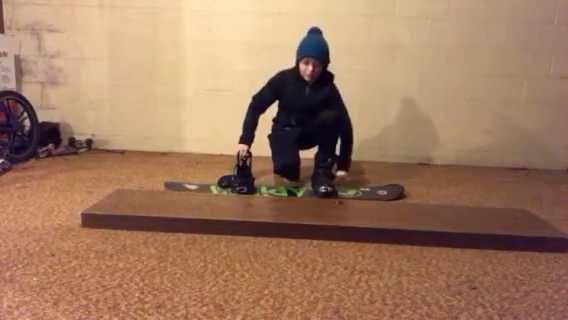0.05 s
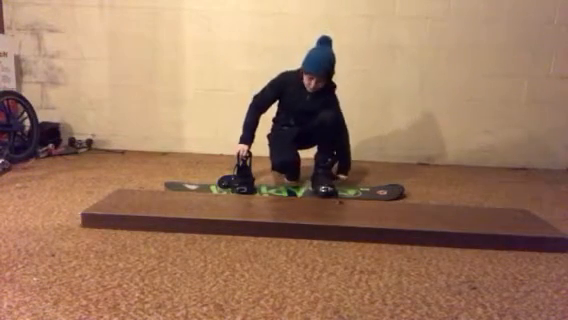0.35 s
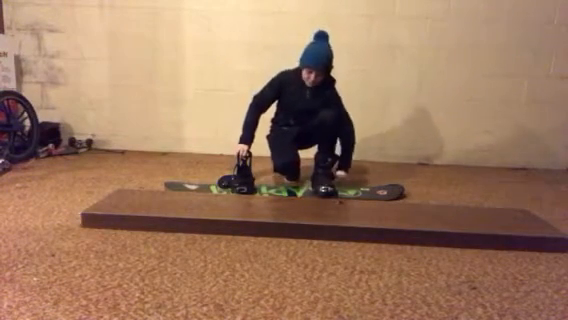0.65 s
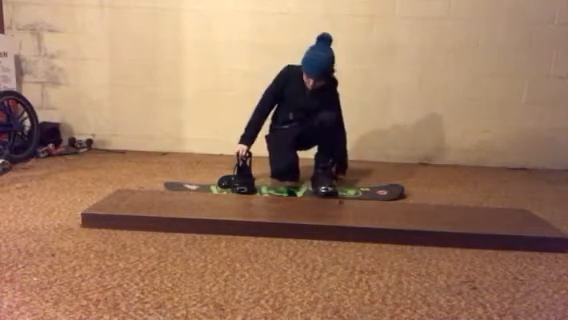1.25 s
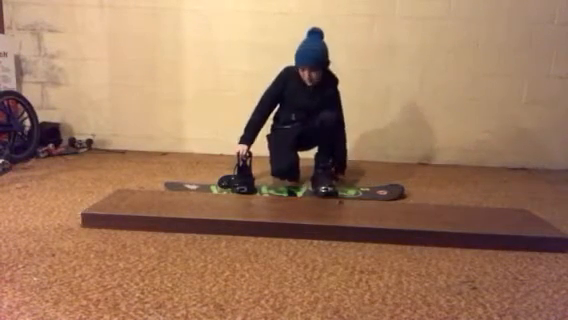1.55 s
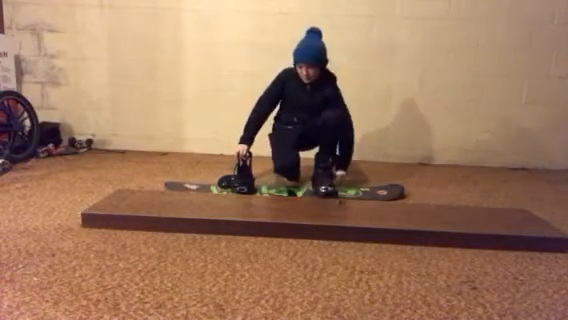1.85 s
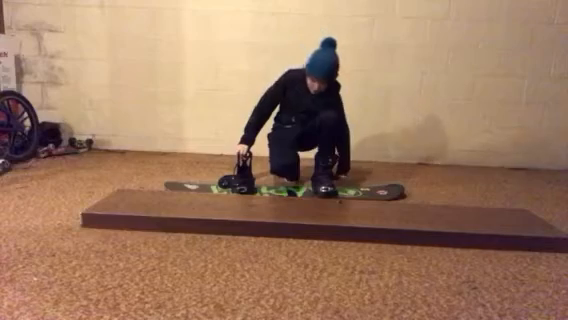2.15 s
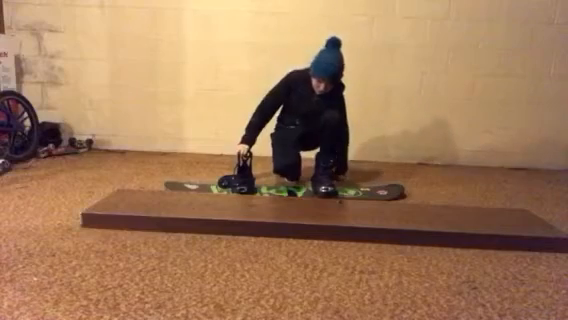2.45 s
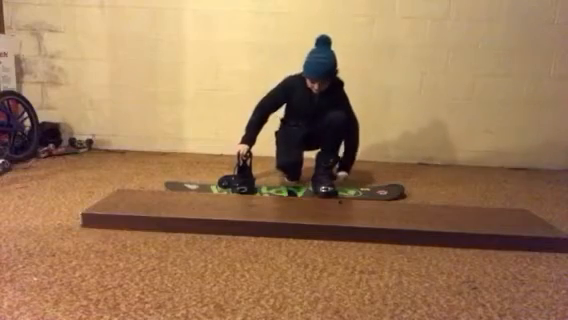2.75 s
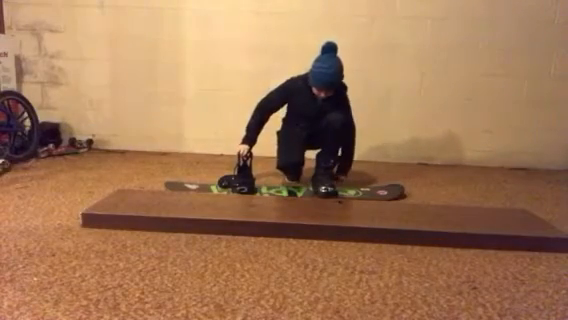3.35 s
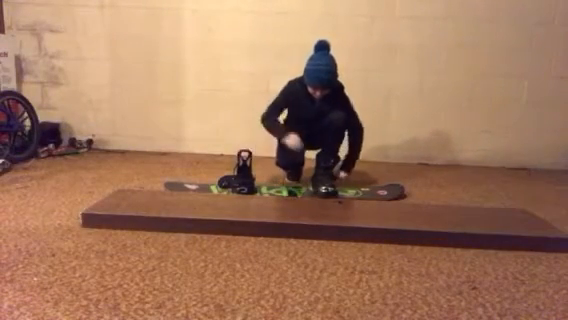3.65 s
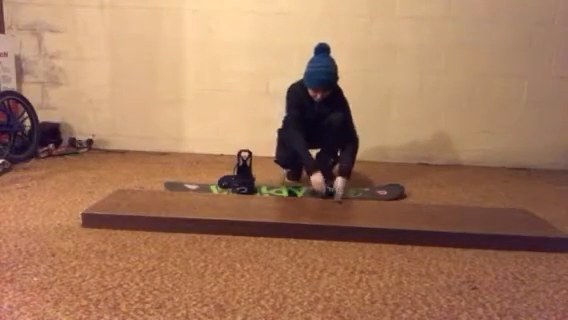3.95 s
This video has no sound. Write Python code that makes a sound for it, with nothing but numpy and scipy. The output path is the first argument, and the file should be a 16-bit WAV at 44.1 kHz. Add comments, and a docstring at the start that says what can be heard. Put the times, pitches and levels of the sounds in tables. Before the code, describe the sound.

A snowboard binding knocked three times by hand, clacking sharply in a quiet room.

```python
"""The plastic highback of a snowboard binding is knocked by hand against its heel cup three times.
Each impact pushes the board and cracks at the plastic, and the modes of board and room ring on.
Before the first knock the binding snaps and faintly squeaks; its ticks, a boot's bumps and scuffs and
the rustle of clothes come throughout, and at the end a strap is grabbed. The board lies on carpet
behind a wooden box, in a quiet room whose block walls return reflections and reverberation."""
import sys
import numpy as np
from scipy import signal
from scipy.fft import rfft, irfft, next_fast_len
from scipy.io import wavfile
from scipy.ndimage import uniform_filter1d

SR = 44100
rng = np.random.default_rng(int(sys.argv[2]) if len(sys.argv) > 2 else 0)


def generate_wav(sig):
    """Save sig (samples, or channels by samples) to the path in sys.argv[1] as 16-bit PCM at SR."""
    pcm = np.round(np.clip(np.atleast_2d(sig).T, -1, 1) * 32767).astype(np.int16)
    wavfile.write(sys.argv[1], SR, pcm)


N = 176400
LEAD_S = .25  # sounds may begin before time zero
LEAD, SIZE = int(LEAD_S * SR), next_fast_len(N + 2 * SR)

# highback impacts (time [s], push [dB], crack [dB], gain near 1 kHz [dB], top treble gain [dB],
# highback resonance [dB])
IMPACTS = [(1.816, 2, 0.5, 6, -1, -3.5), (2.7236, -0.5, 0, 0.5, -4, 2), (3.6464, 0.5, -2.5, 4.5, -5.5, 7)]
# spectra of the push on the board and the crack of the plastic (frequency [Hz], level [dB])
PUSH_SPECTRUM = [(40, -3), (90, 8.5), (200, 16.5), (360, 25.5), (520, 20.5), (740, 6.5), (1300, -12.5),
                 (3800, -7), (7400, -22), (8300, 0), (12500, 0.5), (16000, -8.5)]
CRACK_SPECTRUM = [(600, 0), (1200, 11.5), (1850, 15), (2400, 12), (4100, 14.5), (4850, 2.5), (6200, 8.5),
                  (7300, 5), (8000, 0.5), (12500, -33.5)]
# modes of board and room (frequency [Hz], level [dB])
MODES = [(167, -36), (255, -38), (312, -38), (345, -33), (372, -37), (423, -36), (475, -35), (518, -35),
         (578, -39), (862, -41), (1176, -38), (1500, -41), (1845, -42), (3867, -42)]
# binding snaps, grabs of strap and buckle, boot bumps on the board (time [s], level [dB])
SNAP_EVENTS = [(-.13, -2), (.439, 1)]
GRAB_EVENTS = [(3.835, -0.5), (3.842, -21)]
BUMP_EVENTS = [(.13, -10.5), (.383, 4.5), (.655, -5), (.743, -8), (.79, -10.5), (1.039, -4), (1.698, -9),
               (2.22, -2), (3.115, -4.5), (3.609, 4)]
# ticks of small binding parts (time [s], level [dB], tilt [dB/octave], resonance [Hz])
TICK_EVENTS = [(0.236, -22.5, -6.5, 2950), (0.364, -28, 3, 11000), (0.4317, -13.5, -2, 9000),
               (0.743, -16.5, -5.5, 3050), (0.836, -25.5, -4, 3200), (1.042, -18, -7.5, 2910),
               (1.214, -31.5, 1.5, 3700), (1.698, -22, -6.5, 3900), (2.22, -17, -3.5, 6800),
               (2.68, -22, -7.5, 1870), (2.7085, -8.5, -9.5, 1100), (2.919, -8.5, -5.5, 2880),
               (3.089, -21.5, -6, 3000), (3.1129, -16, -4.5, 3060), (3.338, -24, 1.5, 5600),
               (3.456, -32, 3, 4680), (3.8257, -7, -3.5, 4900)]
# spectra of these four kinds of contact (frequency [Hz], level [dB])
SNAP_SPECTRUM = [(100, -8.5), (1500, -12), (3100, 4), (3600, 5.5), (4100, 10.5), (4800, -0.5), (5700, 2),
                 (6500, 7.5), (8000, 0), (15500, -11.5)]
STRAP_SPECTRUM = [(90, -19), (250, 10), (800, 7.5), (1250, 1), (1900, -9.5), (3050, 9.5), (4700, -8),
                  (6000, -5.5), (10000, -17), (11500, -5), (15500, -18)]
BUMP_SPECTRUM = [(80, -22), (280, -10.5), (1050, -13.5), (1800, -25), (5000, -33), (15000, -55)]
TICK_SPECTRUM = [(300, -9.5), (1700, -13), (2900, 0.5), (4900, -6), (6700, -5), (9000, -14), (15500, -23.5)]
# scuffs of the boot sole (time [s], duration [s], level [dB])
SCUFF_STROKES = [(.375, 0.06, -56.5), (.98, .13, -57), (1.245, 0.061, -59.5), (3.32, 0.04, -57),
                 (3.85, 0.097, -50.5)]
# rubs of cloth and hand (time [s], duration [s], level [dB], tilt [dB/octave])
RUB_STROKES = [(0.041, 0.18, -60.5, -2), (0.275, 0.24, -61, -0.5), (0.628, 0.39, -66, 2),
               (0.95, 0.45, -69, 2.5), (1.61, 0.36, -61.5, -1.5), (3.079, 0.11, -60, -0.5),
               (3.5, 0.12, -65, 4), (3.825, 0.1, -47, 2)]
# spectra of scuffing and rubbing (frequency [Hz], relative level [dB])
SCUFF_SPECTRUM = [(200, -10), (600, -3), (1050, -3.5), (2000, -13.5), (15000, -36.5)]
RUB_SPECTRUM = [(150, 11.5), (1000, -1), (3300, 3), (4700, -7.5), (6500, -9.5), (9000, -17.5),
                (15000, -16.5)]
# squeaking slips (time [s], duration [s], first pitch [Hz], last pitch [Hz], level [dB])
SLIPS = [(-.05, .31, 2000, 1950, -66), (1.603, .09, 1620, 1900, -65)]
# early reflections from wall and ceiling (delay [s], gain [ratio])
REFLECTIONS = [(.0055, 0.36), (.0087, 0.5), (0.0101, 0.25), (0.0184, 0.17)]
# reverberation time (frequency [Hz], time to fall 60 dB [s])
REVERB_T60 = [(80, 0.57), (260, 0.85), (700, 0.6075), (4500, 0.57), (7500, 0.3572), (14000, 0.36)]
# reverberant field (frequency [Hz], level against the direct sound [dB])
REVERB_SPECTRUM = [(80, 3), (300, -2.5), (1000, 4), (3000, -2), (6500, 1), (13000, -7.5)]
# room tone (frequency [Hz], relative level [dB])
AMBIENT_SPECTRUM = [(20, -13.5), (35, -22), (50, 6), (90, 0.5), (135, 2), (180, -10), (1000, -23.5),
                    (3500, -27), (16000, -38)]


def knocks(rise_s=.0007, highback_hz=4130, half_width_hz=410):
    """Impact excitation: a push on the board, and a crack filtered by the highback's resonance."""
    out = np.zeros(SIZE)
    for s, push_db, crack_db, mid_db, top_db, highback_db in IMPACTS:
        colour = [(550, 0), (800, mid_db), (1200, mid_db), (1600, 0), (6000, 0), (12000, top_db)]
        highback = [(highback_hz - half_width_hz, 0), (highback_hz, highback_db),
                    (highback_hz + half_width_hz, 0)]
        crack = signal.fftconvolve(damped_body(CRACK_SPECTRUM, extra=colour), damped_body(highback))
        add(out, s, -from_db(push_db) * damped_body(PUSH_SPECTRUM, extra=colour))
        add(out, s - rise_s, from_db(crack_db) * signal.fftconvolve(chatter(rise_s), crack))
    return out


def damped_body(spectrum, tilt_db=0, extra=((100, 0), (1000, 0))):
    """Minimum-phase impulse response of a well damped body, its spectrum tilted about 3 kHz."""
    size = 4096
    hz = np.maximum(np.arange(size // 2 + 1) * SR / size, 1)
    db = at_hz(spectrum, hz) + at_hz(extra, hz) + tilt_db * np.log2(np.maximum(hz, 750) / 3000)
    cepstrum = irfft(np.log(from_db(db)))
    causal_fold = np.r_[1, np.full(size // 2 - 1, 2), 1, np.zeros(size // 2 - 1)]
    return irfft(np.exp(rfft(cepstrum * causal_fold)))


def chatter(rise_s):
    """Rough-surface contact: two faces meet in a quick swell of tiny impacts."""
    age = np.arange(SR // 10) / SR / rise_s
    burst = rng.choice([-1, 1], len(age)) * age * np.exp(-age)
    gate = np.minimum(age, 1) * np.exp(-(age / 6) ** 2)
    for _ in range(6):  # flatten the spectrum while keeping the burst short
        burst = gate * irfft(np.exp(1j * np.angle(rfft(burst))), len(age))
    return unit_energy(burst)


def ringing(build_s=.0039, t60_share=.65, waver=.5):
    """Free vibration: modes of board and room build after each knock and decay, wavering at random."""
    out, t = np.zeros(SIZE), np.arange(SR) / SR
    knots_s = np.linspace(0, 1, 50)
    for s, *_ in IMPACTS:
        for hz, db in MODES:
            t60 = t60_share * at_hz(REVERB_T60, hz)
            envelope = (1 - np.exp(-t / build_s)) * np.exp(-np.log(1000) * t / t60)
            swell, phase = [np.interp(t, knots_s, row) for row in rng.normal(0, waver, (2, 50))]
            add(out, s, -from_db(db) * envelope * (1 + swell) * np.sin(2 * np.pi * hz * t + phase))
    return out


def contacts(events, spectrum, rise_s):
    """Source and filter: each brief contact force is convolved with a damped part's response."""
    out = np.zeros(SIZE)
    for s, db in events:
        add(out, s, from_db(db) * signal.fftconvolve(chatter(rise_s), damped_body(spectrum)))
    return out


def ticks(resonance_db=3.5):
    """Resonance of small parts as they settle; a duller tick goes with a softer, longer contact."""
    out = np.zeros(SIZE)
    for s, db, tilt_db, hz in TICK_EVENTS:
        resonance = [(hz / np.sqrt(2), 0), (hz, resonance_db), (hz * np.sqrt(2), 0)]
        part = damped_body(TICK_SPECTRUM, tilt_db, resonance)
        rise_s = .0007 * 2 ** (-tilt_db / 7)  # doubles as the tilt falls by 7 dB/octave
        add(out, s - rise_s, from_db(db) * signal.fftconvolve(chatter(rise_s), part))
    return out


def friction(strokes, spectrum, grain_db=5.5):
    """Sliding friction: grainy noise swells and fades with each movement."""
    out = np.zeros(SIZE)
    for s, duration, db, *tilt in strokes:
        n = int(duration * SR)
        grains = rng.standard_normal(SR) * from_db(grain_db * rng.exponential(1, SR).clip(0, 2 * np.pi))
        stroke = unit_energy(grains[:n]) * np.sqrt(n) * np.sin(np.pi * np.arange(n) / n)
        surface = unit_energy(damped_body(spectrum, *tilt))
        add(out, s, from_db(db) * signal.fftconvolve(stroke, surface))
    return out


def squeaks(jitter=.03):
    """Stick-slip oscillation: plastic on plastic gives a thin, rough tone of unsteady pitch."""
    out = np.zeros(SIZE)
    for s, duration, first_hz, last_hz, db in SLIPS:
        n = int(duration * SR)
        waver = uniform_filter1d(rng.standard_normal(SR), size=80)[:n]
        hz = np.linspace(first_hz, last_hz, n) * (1 + jitter * waver / waver.std())
        roughness = unit_energy(uniform_filter1d(rng.standard_normal(SR), size=300)[:n]) * np.sqrt(n)
        envelope = from_db(db) * roughness * np.sin(np.pi * np.arange(n) / n)
        add(out, s, envelope * np.sin(2 * np.pi * np.cumsum(hz) / SR))
    return out


def room_response(build_s=.0015, scatter_gain=.83, scatter_s=.007, reflection_cut_hz=16000):
    """Reverberation: direct sound, four reflections and a diffuse tail that decays band by band."""
    t, hz = np.arange(SR) / SR, np.maximum(np.arange(SR // 2 + 1), 1)
    white, tail = rfft(rng.standard_normal(SR)), np.zeros(SR)
    edges = np.r_[1, np.geomspace(100, SR / 2 + 1, 18)]
    for low, high in zip(edges, edges[1:]):
        t60 = at_hz(REVERB_T60, np.sqrt(low * high))
        tail += irfft(white * ((hz >= low) & (hz < high))) * np.exp(-np.log(1000) * t / t60)
    tail *= 1 + scatter_gain * np.exp(-t / scatter_s)  # early scatter off board, box and floor
    window = (1 - np.exp(-(t / build_s) ** 2)) * np.exp(-(t / .7) ** 8)
    for _ in range(2):  # even out the tail's spectrum, then give it the room's colour
        spectrum = rfft(tail * window)
        power = uniform_filter1d(uniform_filter1d(np.abs(spectrum) ** 2, size=35), size=35)
        tail = irfft(spectrum / np.sqrt(np.abs(power) + 1e-9) * from_db(at_hz(REVERB_SPECTRUM, hz)))
    response = tail * window
    response[0] += 1  # direct sound
    for delay, gain in REFLECTIONS:
        i = int(delay * SR)
        lowpass = np.exp(-2 * np.pi * reflection_cut_hz * t[:SR - i])
        response[i:] += gain * lowpass / lowpass.sum()
    return response


def room_tone(level_db=-60):
    """Stationary background noise: a low rumble and a faint hiss."""
    hz = np.maximum(np.arange(SIZE // 2 + 1) * SR / SIZE, 1)
    noise = irfft(rfft(rng.standard_normal(SIZE)) * from_db(at_hz(AMBIENT_SPECTRUM, hz)), SIZE)
    return from_db(level_db) * noise / noise.std()


def from_db(db):
    """Amplitude ratio of a level in decibels."""
    return 10 ** (np.asarray(db) / 20)


def at_hz(points, hz):
    """Interpolation on a log-frequency axis."""
    frequencies, values = np.transpose(points)
    return np.interp(np.log(hz), np.log(frequencies), values)


def unit_energy(x):
    """Normalisation to an energy of one."""
    return x / np.sqrt(np.sum(x ** 2) + 1e-20)


def add(track, s, sound):
    """Superposition of a short sound on a track at time s."""
    i = int((s + LEAD_S) * SR)
    track[i:i + len(sound)] += sound


def scene():
    """Superposition: handling sounds convolved with the room, the ringing modes and the room tone."""
    room = room_response()
    binding = knocks() + contacts(SNAP_EVENTS, SNAP_SPECTRUM, rise_s=.00017) + ticks()
    binding += contacts(GRAB_EVENTS, STRAP_SPECTRUM, rise_s=.0016) + squeaks()
    boot = contacts(BUMP_EVENTS, BUMP_SPECTRUM, rise_s=.006) + friction(SCUFF_STROKES, SCUFF_SPECTRUM)
    cloth = friction(RUB_STROKES, RUB_SPECTRUM)
    low_cut = signal.butter(2, 150, "high", fs=SR, output="sos")  # small parts radiate little bass
    handling = signal.sosfilt(low_cut, binding + boot + cloth)
    heard = signal.fftconvolve(handling, room)[:SIZE] + ringing() + room_tone()
    return heard[None, LEAD:LEAD + N]


def record(dry):
    """Soft saturation rounds the highest peaks, and a steep low-pass filter limits the bandwidth."""
    ceiling, cutoff_hz = .72, 16400
    rounded = dry / (1 + (dry / ceiling) ** 6) ** (1 / 6)
    return signal.sosfilt(signal.ellip(10, .1, 70, cutoff_hz, fs=SR, output="sos"), rounded)


dry = scene()
out = record(dry)
generate_wav(out)
```